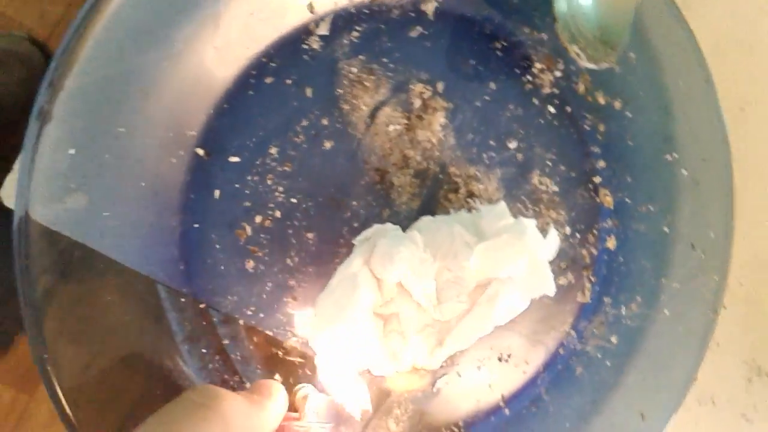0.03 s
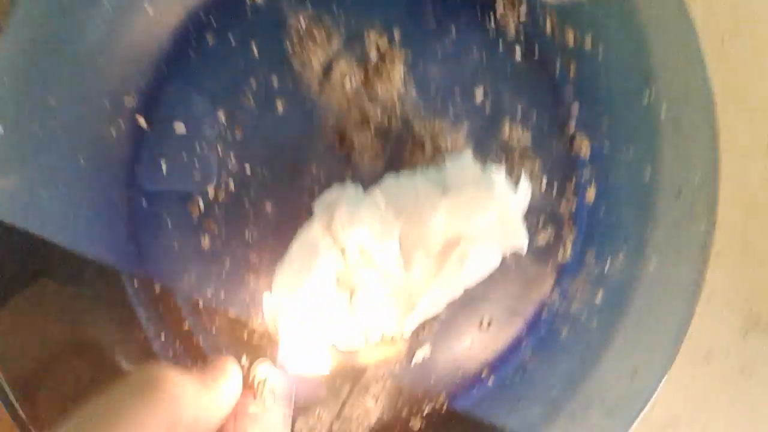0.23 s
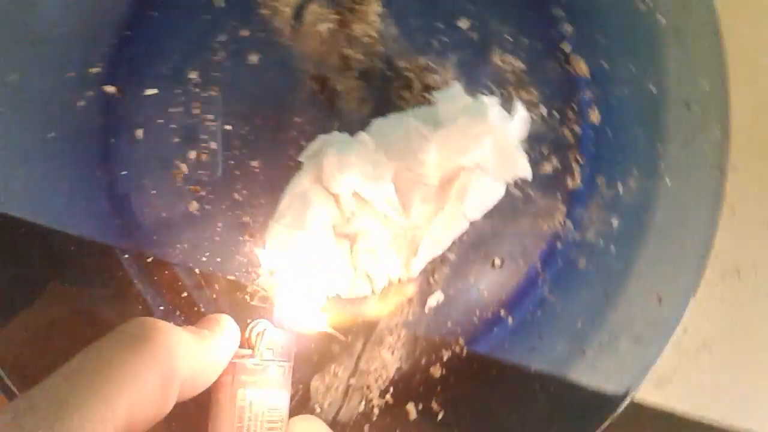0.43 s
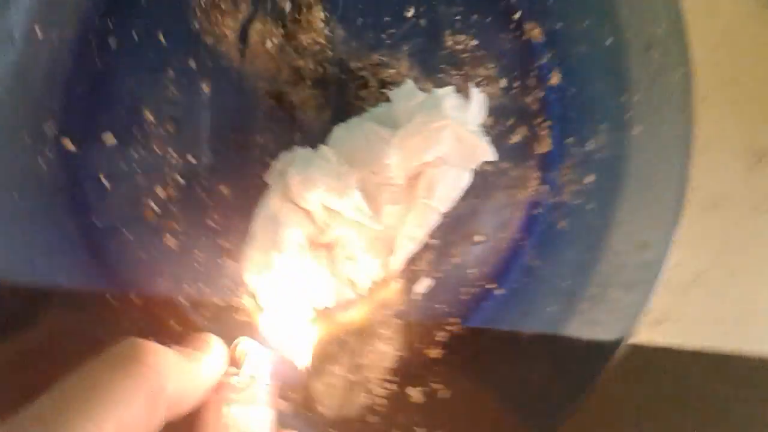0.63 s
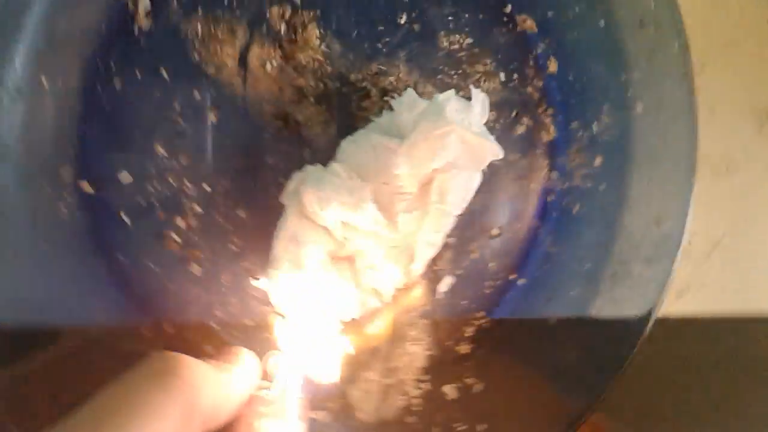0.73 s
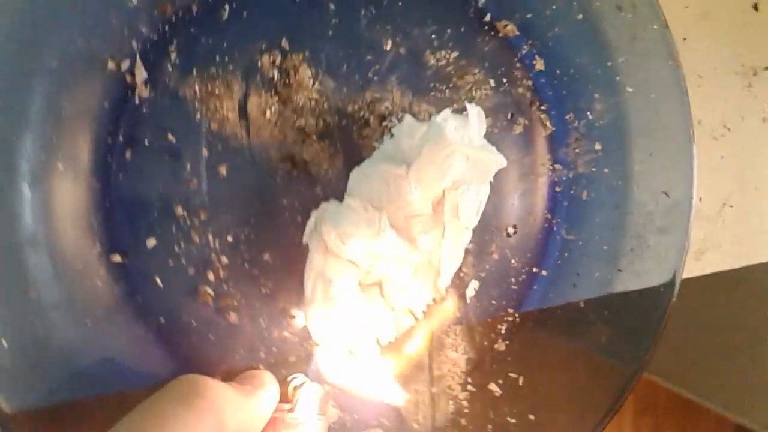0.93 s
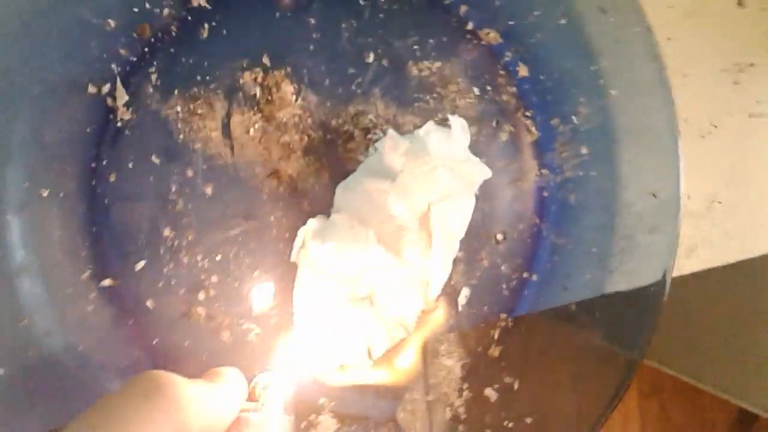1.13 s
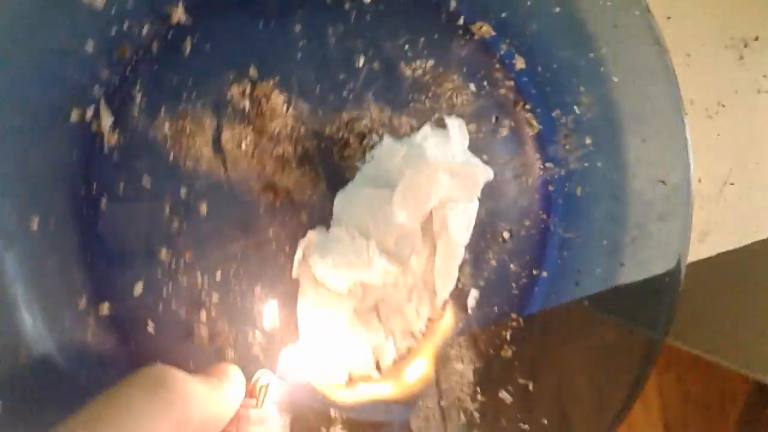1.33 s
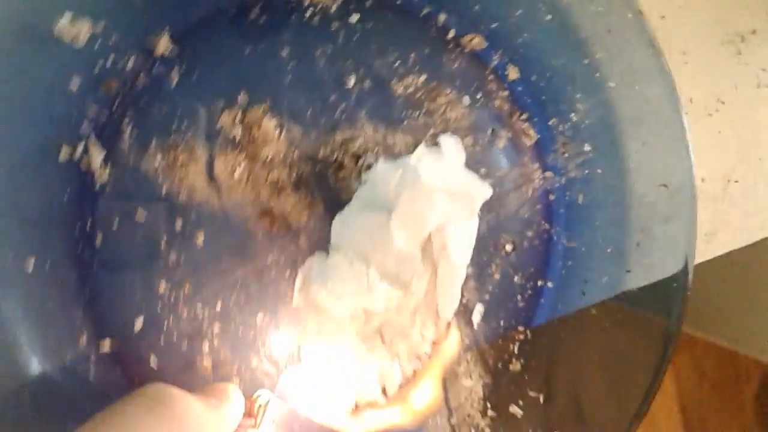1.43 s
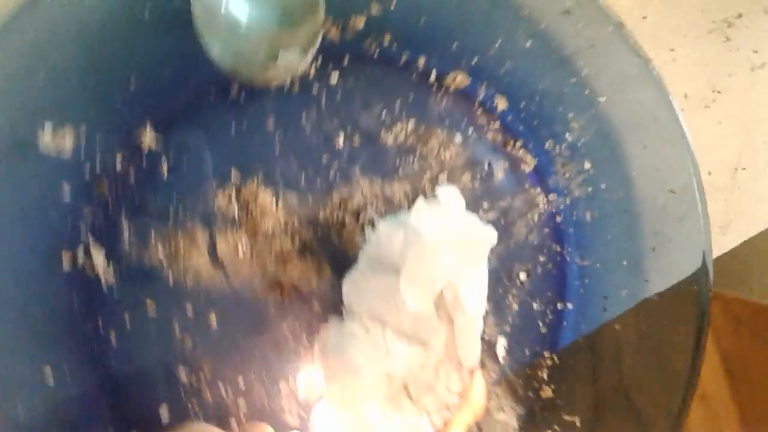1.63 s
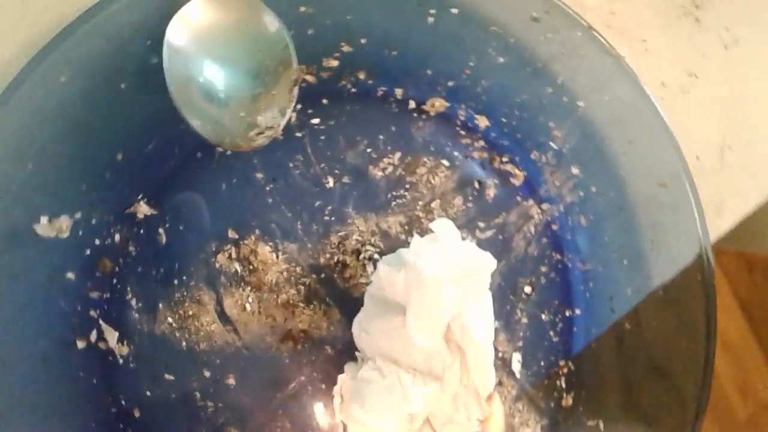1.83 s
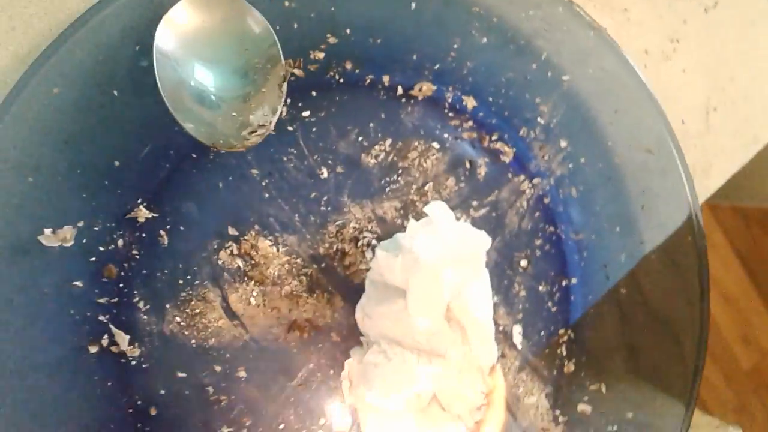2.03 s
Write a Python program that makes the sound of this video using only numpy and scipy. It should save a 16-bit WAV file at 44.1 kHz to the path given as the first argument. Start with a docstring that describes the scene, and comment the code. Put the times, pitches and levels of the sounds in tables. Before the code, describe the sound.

Dull handling bumps sound close to a hand-held microphone in a quiet room: one soft thump, a tiny tick, a fainter bump, a light, briefly ringing knock on a bowl, then one last bump, over faint hum and hiss.

```python
"""Handling in a quiet room

Low rumble, a faint hum and microphone hiss surround a hand-held camera above a glass bowl on a table.
Handling adds three soft thumps, each a dull contact and a low pressure pulse, and one tiny tick.
One light knock excites the damped modes of the struck object, which rings briefly."""
import sys
import numpy as np
from scipy.fft import rfft, irfft, next_fast_len
from scipy.io import wavfile
from scipy.ndimage import map_coordinates

SR = 44100
rng = np.random.default_rng(int(sys.argv[2]) if len(sys.argv) > 2 else 0)


def generate_wav(sig):
    """Save sig (samples, or channels by samples) to the path in sys.argv[1] as 16-bit PCM at SR."""
    pcm = np.round(np.clip(np.atleast_2d(sig).T, -1, 1) * 32767).astype(np.int16)
    wavfile.write(sys.argv[1], SR, pcm)


N = 92610

# room rumble (frequency [Hz], relative spectral density [dB])
RUMBLE_SPECTRUM = [(12, -49), (20, -14), (48, 0), (108, -1.5), (125, -1.5), (142, -8.5), (235, -10.5),
                   (292, -20.5), (318, -15.5), (345, -20.5), (495, -22.5), (583, -22), (632, -26.5),
                   (1000, -35), (1300, -60), (2200, -120)]
# microphone hiss (frequency [Hz], relative spectral density [dB])
HISS_SPECTRUM = [(590, -9.5), (1000, -1.5), (1350, -3.5), (2240, -3.5), (3240, -7.5), (5380, -11),
                 (7170, -16), (7960, -15.5), (9350, -20), (11200, -23), (12200, -21), (14700, -14),
                 (15700, -12)]
# stereo width of the noise (frequency [Hz], side relative to mid [dB])
SIDE_SPECTRUM = [(100, -73), (350, -24), (700, -15), (1400, -10), (2800, -8), (5600, -7), (10500, -3),
                 (14500, -4.5)]
# the room's response to the tick (frequency [Hz], relative spectral density [dB])
TICK_TAIL_SPECTRUM = [(200, -2), (500, 1), (1500, -4), (3200, -10), (5000, -24), (10000, -45)]
# soft thumps (time [s], push level [dB], push frequency [Hz], push half length [s],
# contact level [dB], rub relative to contact [dB])
THUMP_EVENTS = [(0.2465, -22.5, 115, 0.0051, -35.5, -17.5), (1.3545, -38, 94, 0.0075, -49, -12),
                (1.8115, -43, 89.3, 0.011, -60, -11)]
# skin friction around a thump (frequency [Hz], relative spectral density [dB])
RUB_SPECTRUM = [(60, -15), (250, 10), (550, 17), (900, -21), (2000, -46)]
# normal modes of the knocked object (frequency [Hz], level [dB], decay time T60 [s])
KNOCK_MODES = [(237.3, -48.5, 0.22), (316, -51, 0.24), (363, -57, 0.15), (461, -52, 0.2),
               (516, -57.5, 0.096), (592, -58, 0.15), (688, -56, 0.14), (825, -61.5, 0.082),
               (1020, -68, 0.14)]
# the room's response to the knock (frequency [Hz], relative spectral density [dB])
KNOCK_TAIL_SPECTRUM = [(100, -12), (240, 5), (700, -14), (1000, -17.5), (2500, -23.5), (6000, -50)]

RUMBLE_DB, HISS_DB = -51.5, -68
HUM_HZ, HUM_DB, HUM_WAVER_DB, HUM_DRIFT_RAD = 119.54, -61, 2.5, 0.34
TICK_S, TICK_DB, TICK_TAIL_REL_DB = 0.8277, -41.8, -26
CONTACT_HZ, CONTACT_RISE_S, CLICK_REL_DB = 279, 0.0003, -7  # click relative to the contact
PUSH_LAG_S, PUSH_SAG_PER_S, BOOM_REL_DB = 0.0085, 40, -20.5  # boom relative to the push
RUB_HALF_S = 0.0076
KNOCK_S, EDGE_DB, RECOIL_DB, KNOCK_TAIL_DB = 1.5565, -37.5, -30.5, -54
BAND_LIMIT_HZ = 15750


def amp(db):
    """Logarithmic level: 20 dB is a factor of ten in amplitude."""
    return 10 ** (np.asarray(db) / 20)


def gain_at(spectrum, hz):
    """Spectral envelope: the gain at hz, with levels interpolated over log frequency."""
    knots_hz, db = np.transpose(spectrum)
    return amp(np.interp(np.log(hz + 1), np.log(knots_hz + 1), db))


def since(s):
    """Time shift: seconds elapsed since time s, for every sample."""
    return np.arange(N) / SR - s


def wobble(rate):
    """Slow random modulation: a spline through rate random knots a second."""
    knots = rng.standard_normal(int(N * rate / SR) + 4)
    return map_coordinates(knots, [np.arange(N) * rate / SR])


def filtered(x, response):
    """Linear filtering: the spectrum of x is multiplied by a frequency response."""
    size = next_fast_len(N + SR // 2)
    hz = np.fft.rfftfreq(size, 1 / SR)
    return irfft(rfft(x, size) * response(hz), size)[..., :N]


def noise(spectrum):
    """Spectral shaping: white noise is coloured, then scaled to rms 1."""
    coloured = filtered(rng.standard_normal(N), lambda hz: gain_at(spectrum, hz))
    return coloured / np.sqrt(np.mean(coloured ** 2) + 1e-20)


def stereo_noise(spectrum):
    """Partial coherence: an independent side signal widens the treble and leaves the bass central."""
    side = filtered(noise(spectrum), lambda hz: gain_at(SIDE_SPECTRUM, hz))
    return noise(spectrum) + np.array([side, -side])


def fade(s, t60, rise=0.00032):
    """Exponential damping: a quick rise at time s, then a fall of 60 dB every t60 seconds."""
    t = np.maximum(since(s), 0)
    return (1 - np.exp(-t / rise)) * np.exp(-np.log(1000) * t / t60)


def ring(s, hz, t60, rise=0.00023):
    """Free vibration of one damped mode struck at time s."""
    return fade(s, t60, rise) * np.sin(2 * np.pi * hz * since(s))


def pulse(s, hz, half_s):
    """A Gaussian wave packet: about one cycle of pressure, centred on time s."""
    t = since(s)
    return np.exp(-(t / half_s) ** 2) * np.cos(2 * np.pi * hz * t)


def room_tone():
    """Stationary rumble and hiss, with a hum under slow amplitude and phase modulation."""
    phase = 2 * np.pi * HUM_HZ * since(0) + HUM_DRIFT_RAD * wobble(6.02)
    hum = np.sqrt(2) * amp(HUM_DB + HUM_WAVER_DB * wobble(9)) * np.sin(phase)
    rumble = amp(RUMBLE_DB) * stereo_noise(RUMBLE_SPECTRUM)
    hiss = amp(HISS_DB) * stereo_noise(HISS_SPECTRUM)
    return rumble + hiss + hum


def tick():
    """Relaxation: a pressure step dies away at once as a tiny snap, and the room reverberates faintly."""
    snap = fade(TICK_S, t60=0.0045, rise=0.00008)
    tail = amp(TICK_TAIL_REL_DB) * fade(TICK_S, t60=0.08) * stereo_noise(TICK_TAIL_SPECTRUM)
    return amp(TICK_DB) * (snap / snap.max() + tail)


def thumps():
    """Soft impact: a dull contact with skin friction, then a low push that sags in pitch and booms."""
    out = np.zeros(N)
    for s, push_db, hz, half_s, contact_db, rub_db in THUMP_EVENTS:
        contact = ring(s - CONTACT_RISE_S, CONTACT_HZ, t60=0.034, rise=CONTACT_RISE_S)
        click = amp(CLICK_REL_DB) * pulse(s, hz=470, half_s=0.0011)
        rub = amp(rub_db) * np.exp(-np.abs(since(s)) / RUB_HALF_S) * noise(RUB_SPECTRUM)
        t = since(s + PUSH_LAG_S)  # zero at the top of the swell
        swell = np.exp(1 - np.hypot(1, np.sqrt(2) * t / half_s))
        pitch_ratio = np.exp(-PUSH_SAG_PER_S * np.clip(t, -.5, .5))
        cycles = hz * (1 - pitch_ratio) / PUSH_SAG_PER_S  # integral of the falling frequency
        push = swell * np.sin(2 * np.pi * cycles)
        boom = amp(BOOM_REL_DB) * ring(s + PUSH_LAG_S, hz=57, t60=0.16)
        out += amp(push_db) * (push + boom) + amp(contact_db) * (contact + click + rub)
    return out


def knock():
    """Impulse excitation: a firm edge, a low recoil and hollow modal ringing, with faint reverberation."""
    edge = amp(EDGE_DB) * pulse(KNOCK_S, hz=390, half_s=0.00094)
    recoil = -amp(RECOIL_DB) * ring(KNOCK_S, hz=151, t60=0.019, rise=0.00071)
    modes = -sum(amp(db) * ring(KNOCK_S, hz, t60, rise=0.0019) for hz, db, t60 in KNOCK_MODES)
    tail = amp(KNOCK_TAIL_DB) * fade(KNOCK_S, t60=0.28, rise=0.0063) * stereo_noise(KNOCK_TAIL_SPECTRUM)
    return edge + recoil + modes + tail


def scene():
    """Superposition: the handling sounds add to the room tone at the centre of the stereo image."""
    return room_tone() + thumps() + knock() + tick()


def record(dry):
    """Ideal low-pass filtering: the camera passes nothing above its band limit."""
    return filtered(dry, lambda hz: hz < BAND_LIMIT_HZ)


dry = scene()
out = record(dry)
generate_wav(out)
```